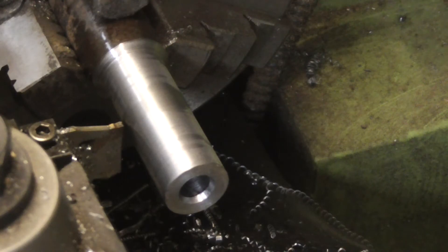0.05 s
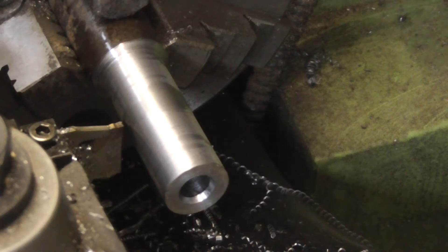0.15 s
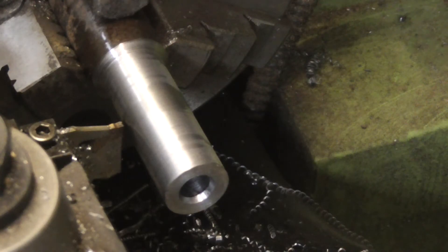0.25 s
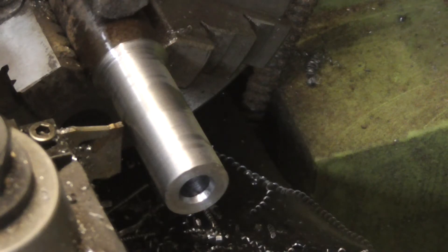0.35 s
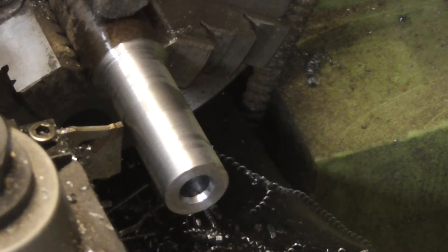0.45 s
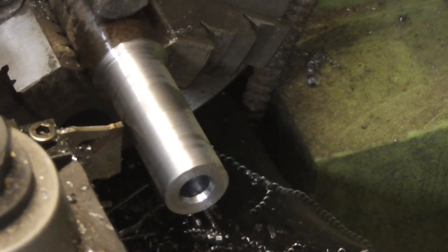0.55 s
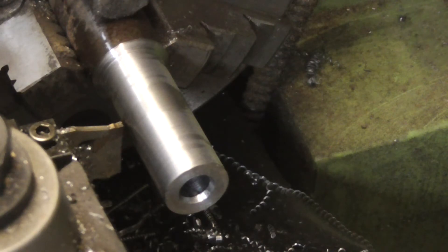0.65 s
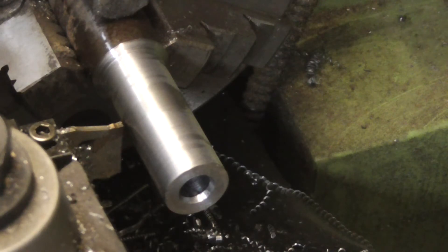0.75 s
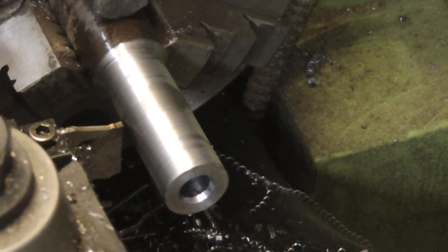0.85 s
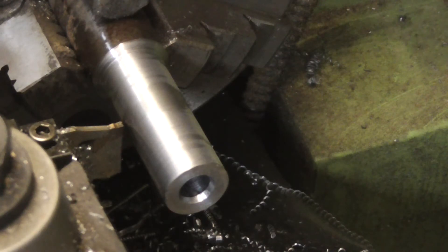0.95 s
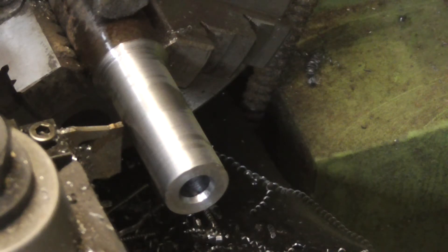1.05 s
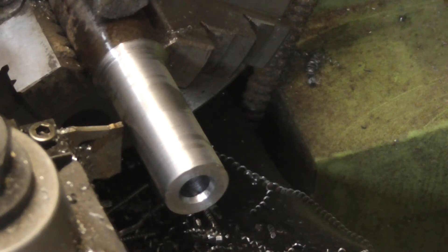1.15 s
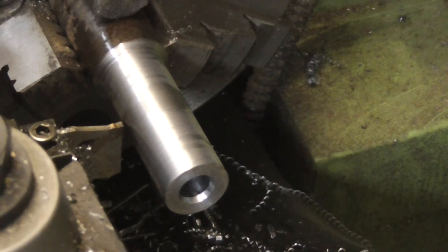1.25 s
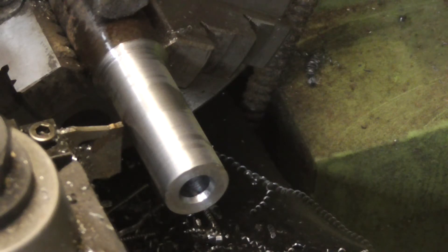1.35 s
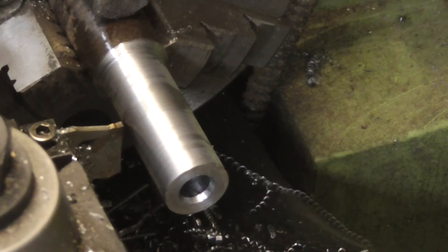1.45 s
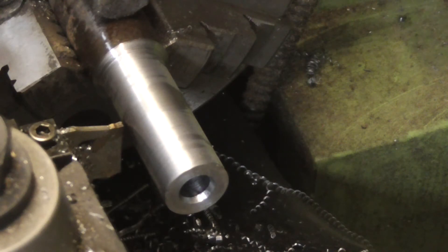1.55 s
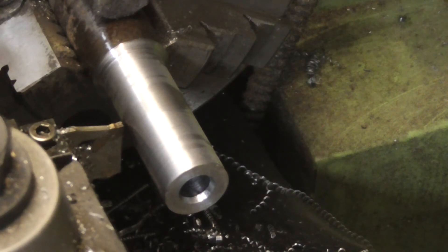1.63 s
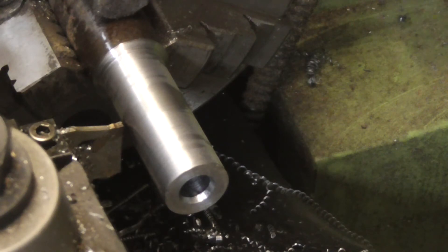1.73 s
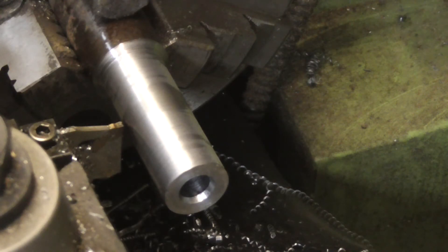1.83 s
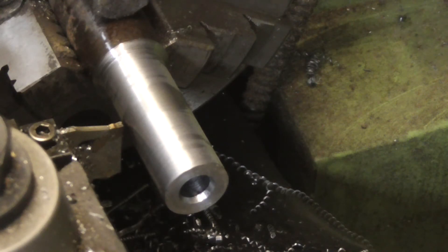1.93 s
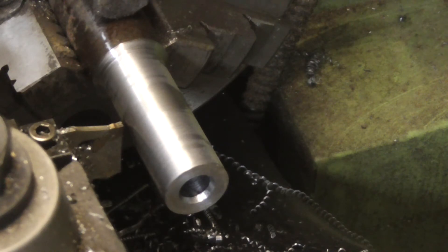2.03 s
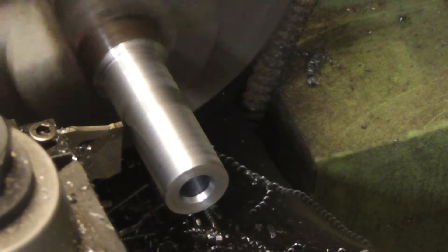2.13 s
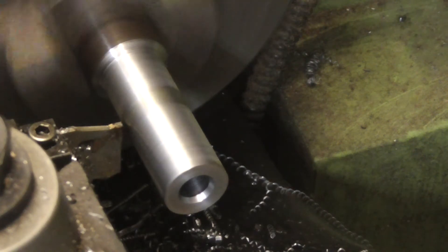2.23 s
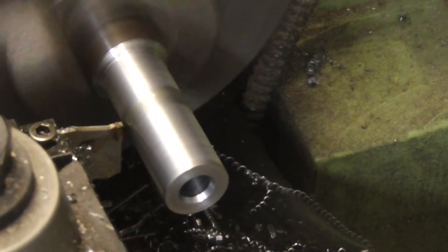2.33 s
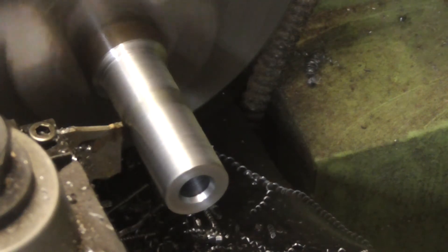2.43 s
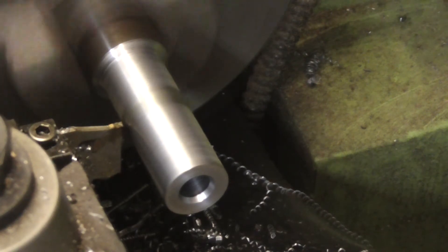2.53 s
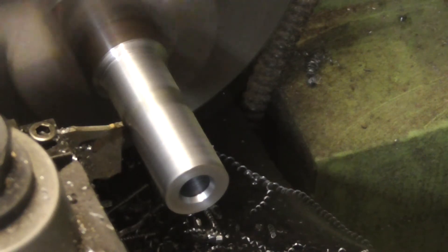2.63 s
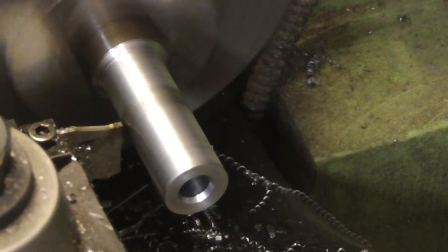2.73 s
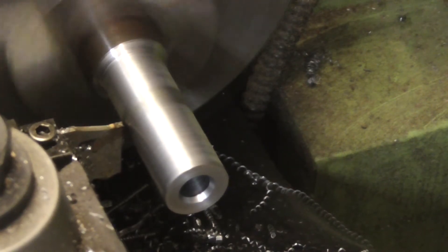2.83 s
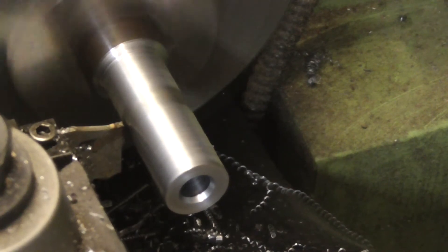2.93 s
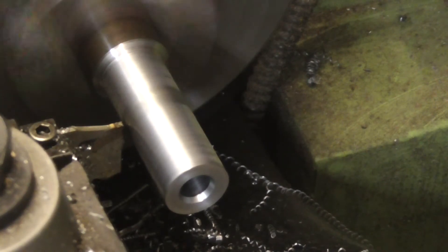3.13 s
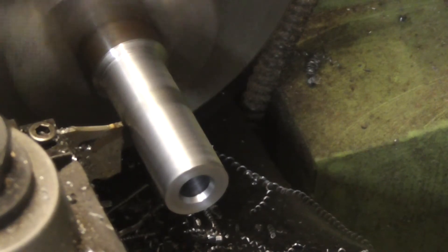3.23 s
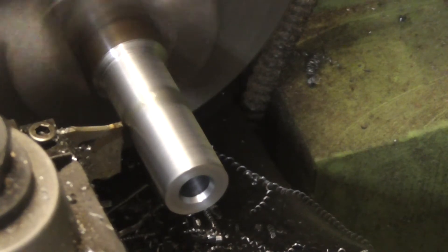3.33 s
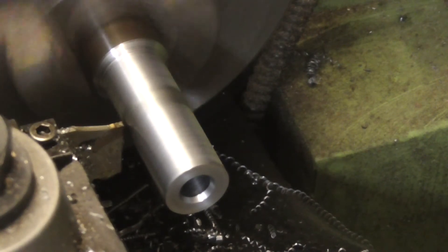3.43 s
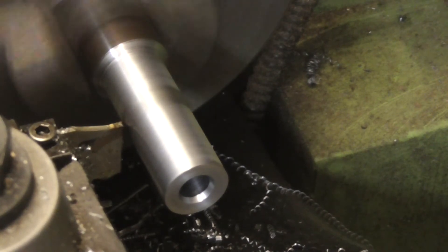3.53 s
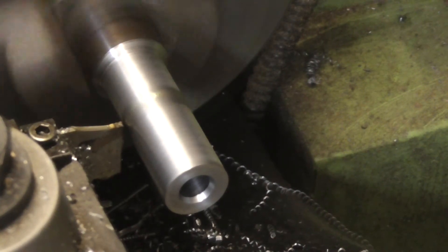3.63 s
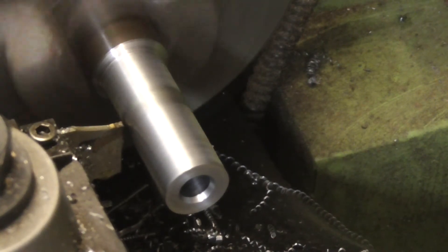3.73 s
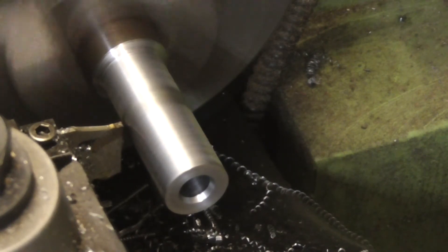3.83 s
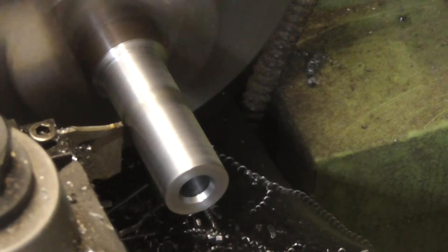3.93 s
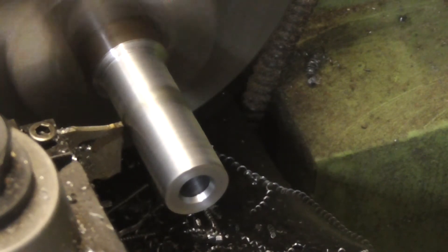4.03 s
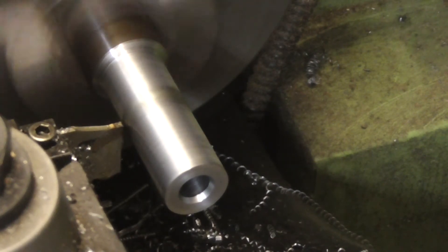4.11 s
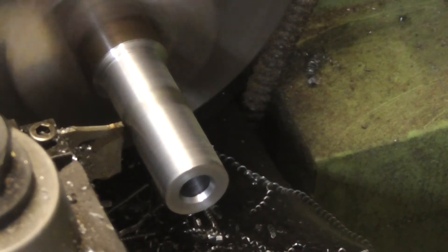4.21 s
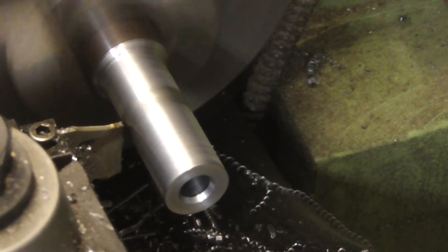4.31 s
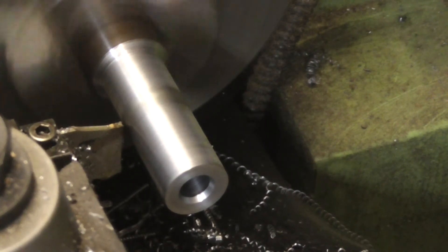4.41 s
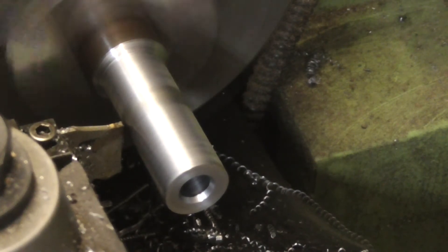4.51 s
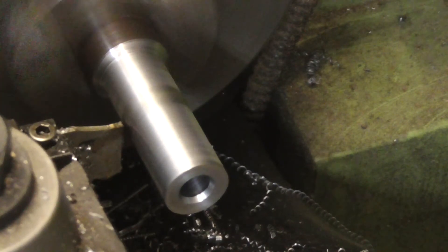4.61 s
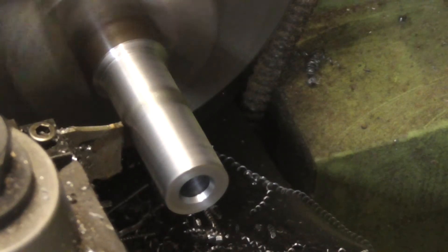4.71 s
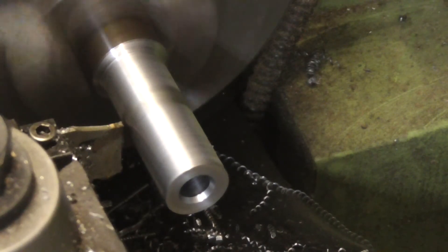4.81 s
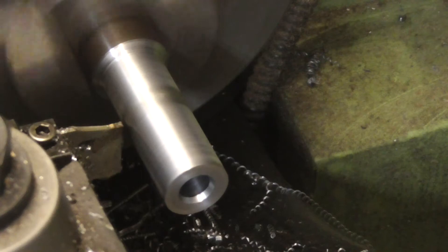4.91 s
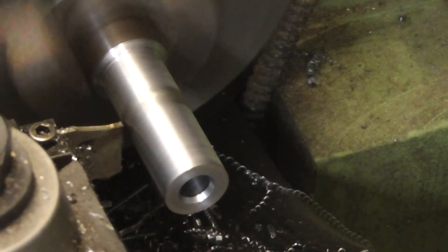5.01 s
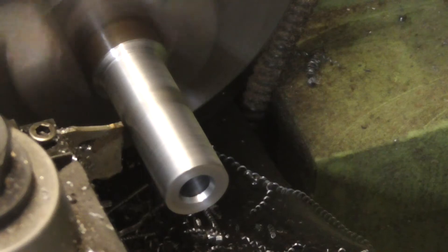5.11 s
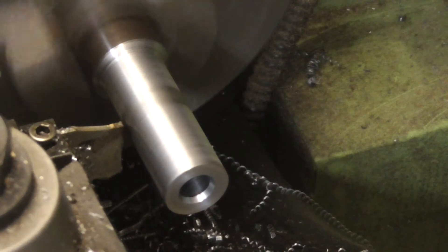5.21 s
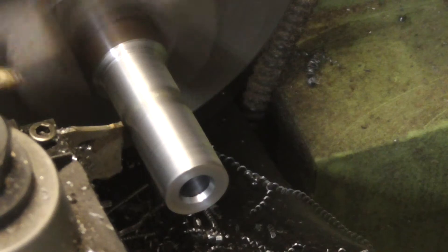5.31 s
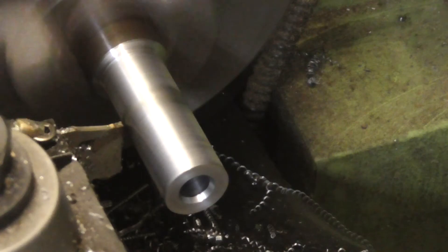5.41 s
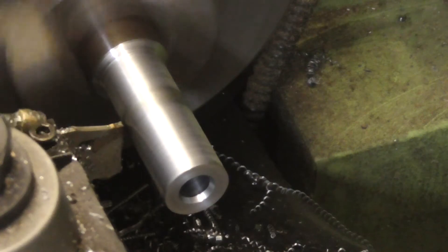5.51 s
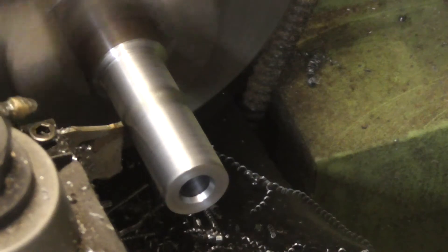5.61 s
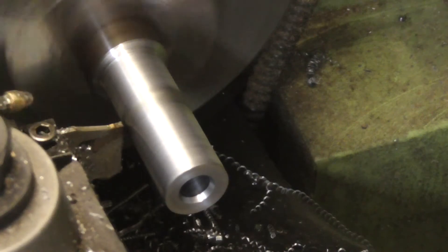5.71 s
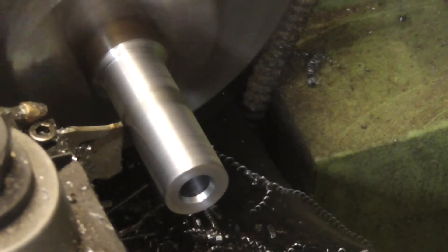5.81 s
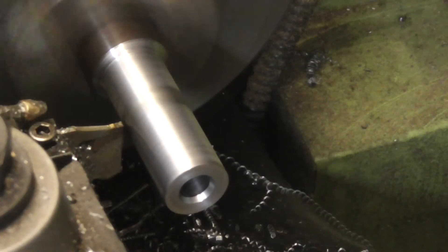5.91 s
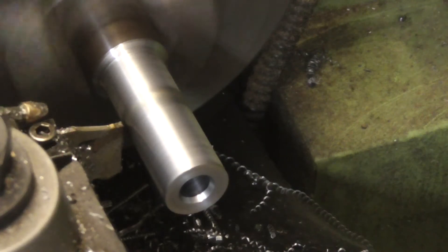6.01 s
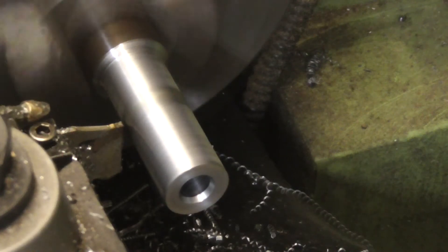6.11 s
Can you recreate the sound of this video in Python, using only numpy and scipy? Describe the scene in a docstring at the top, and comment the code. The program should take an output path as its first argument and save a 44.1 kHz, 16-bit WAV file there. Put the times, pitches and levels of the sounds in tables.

```python
"""A geared lathe runs up to speed before two microphone ports in a small workshop: gear teeth sing on shaft
orders, noise rumbles and booms through the casing, and narrow noise bands whine and sing on top.
Beforehand hands rustle as shaped noise, a lever clunks as body modes, loose parts ping as dying tones
and a switch snaps as bright noise bursts. Room tone and a faint idle hum lie behind, and a sparse echo
places the blows in the shop."""
import sys
import numpy as np
from scipy import signal
from scipy.fft import rfft, irfft
from scipy.io import wavfile
from scipy.ndimage import uniform_filter1d

SR = 44100
rng = np.random.default_rng(int(sys.argv[2]) if len(sys.argv) > 2 else 0)


def to_wav(s):
    """Save 16-bit WAV."""
    ch = np.atleast_2d(s).T  # columns
    pcm = np.round(np.clip(ch, -1, 1) * 32767)  # PCM
    wavfile.write(sys.argv[1], SR, pcm.astype(np.int16))


N = 271215  # samples
T, HZ = np.arange(N) / SR, np.fft.rfftfreq(N, 1 / SR)

SPINDLE_HZ, LAYSHAFT_HZ = 9.1233, 13.069  # turns a second at full speed
SWITCH_S, PULL_UP_S, PULL_UP_POWER = 2.1, 0.097, 1.55
LOAD_DB, PULL_DB, PULL_S, PULL_WIDE_S = 0.5, 3.5, 2.225, 0.075  # gear gain, extra while pulling up, when
THROB_HZ, THROB_DB, THROB_TOP_S = 3.32, 1, 4.09  # slow throb of the boom
EDGE_HZ = 16400  # recorder's upper edge

# tones of the spindle gears, before load and casing: [order of the shaft], [level/dB]
SPINDLE_ORDERS = [19, 27, 41, 43, 53, 55, 62, 75, 83, 86, 89, 95, 117, 118, 119, 129, 130, 131, 147, 159,
                  161, 163]
SPINDLE_DB = [-48, -51, -50, -47, -39, -49, -46, -48, -37.5, -31, -49, -52, -51, -49, -50, -50, -50, -51,
              -54, -47.5, -54, -55]
# tones of the layshaft gears, before load and casing: [order of the shaft], [level/dB]
LAYSHAFT_ORDERS = [27, 32, 34, 51, 72, 75, 112]
LAYSHAFT_DB = [-52, -39, -51, -45, -53, -52, -52]
# motor slot and bearing tones at full speed, before load and casing: [f/Hz], [level/dB]
MOTOR_HZ = [298.6, 316.6, 612.4, 723.7, 1129, 1155.1, 1720.6, 1934.1, 2094.3, 2243.2]
MOTOR_DB = [-55, -54, -45, -43, -50, -47, -60, -62, -60, -62]
# relative colour of the rumble: [f/Hz, level/dB per Hz]
RUMBLE_COLOUR = [(12, -60), (20, -18.5), (97, -18.5), (199, -8.5), (302, -11.5), (398, -8.5), (620, -11),
                 (770, -7), (800, -9.5), (889, -10.5), (1170, -10.5), (2690, -24.5), (4950, -25),
                 (5850, -36.5), (11400, -36.5), (15000, -101)]
# casing resonances lifted out of the rumble: [f/Hz], [width/Hz, relative level/dB]
CASING_HZ = [152, 246, 385, 415, 570, 660, 714, 774, 838, 955, 1085, 1170, 1350, 1485, 1570, 1700, 1870,
             2420, 2905, 3293, 3585, 3684, 3792, 4045, 4332, 4912, 4975, 5370, 6360, 9800, 690, 745, 895,
             1830, 2140]
CASING_SHAPE = [(26.8, 6.5), (10.1, -22.5), (30, 5), (19.1, 5.5), (50, 10), (21.7, 13), (18, 8.5),
                (15.3, 11), (12, 10.5), (31, 7.5), (40, -17), (125, 6), (30, 8.5), (60, 6), (60, 2.5),
                (59.7, -23), (95, -0.5), (120, 1.5), (40, 6), (35.3, 7.5), (40, 11), (50, 7.5), (39.7, 8.5),
                (39, 7), (155, 8.5), (39.8, 7.5), (101, 9.5), (74, 1.5), (80, 10.5), (231, -14), (12, 7),
                (30, 2), (30, 3), (30, 2.5), (200, 4)]
# start of the rumble, whose last level then holds: [t/s, level/dB]
RUMBLE_START = [(2.084, -39), (2.099, -40), (2.115, -19), (2.125, -23), (2.135, -29.5), (2.225, -29),
                (2.3, -30), (2.45, -29.5)]
# booming cabinet panels, before sharpening: [f/Hz], [width/Hz, relative level/dB]
PANEL_HZ = [199, 218]
PANEL_SHAPE = [(22.3, 9.5), (14.815, 4)]
# boom flaring in the pull-up, then wavering, before the throb: [t/s, level/dB]
BOOM_LEVEL = [(2.1, -43), (2.125, -28), (2.151, -28), (2.225, -21), (2.27, -36), (2.3, -35), (2.36, -31),
              (2.5, -38.5), (2.81, -29), (2.87, -52), (2.92, -31.5), (3.16, -33), (3.22, -27),
              (3.33, -32.5), (3.48, -29.5), (4.87, -34), (4.96, -24.5), (4.99, -34.5), (5.35, -30.5),
              (6.15, -31.5)]
# gearbox walls, width before sharpening: [f/Hz, width/Hz, mid level/dB]
HOUSING = [(530, 30, -45), (664, 24, -40), (714, 18, -42), (742, 24, -44), (773, 18, -37.5)]
# whining thin parts, width before sharpening: [f/Hz], [width/Hz, mid level/dB]
WHINE_HZ = [6752, 6725, 9005, 11255, 14000]
WHINE_SHAPE = [(16, -54), (25, -60.5), (50, -54), (45, -59), (70, -69)]
# two thin parts ringing with the drive, width before sharpening: [f/Hz], [width/Hz]
SING_HZ = [3296, 4915]
SING_WIDE_HZ = [40, 50]
# surges of the two thin parts, before flutter: [t/s, lower tone level/dB, upper tone level/dB]
SING_LEVEL = [(2.25, -63, -53), (2.48, -55, -48), (2.53, -45, -67), (2.63, -51, -47), (2.92, -45, -50),
              (2.97, -61.5, -43), (2.99, -53, -49), (3.93, -51, -50.5), (4.33, -63, -47),
              (4.36, -50.5, -53), (5.1, -59, -45.5), (5.13, -61, -63), (5.58, -52.5, -42.5),
              (5.91, -53, -55), (6.05, -62, -49.5), (6.15, -49, -56)]
# gear train chattering under the pull, before flutter: [t/s, level/dB]
GROWL_LEVEL = [(2.105, -57), (2.115, -27), (2.14, -29.5), (2.18, -27), (2.21, -27), (2.245, -21.5),
               (2.27, -28), (2.33, -59)]
# resonances of the chatter, before squaring: [f/Hz, width/Hz, relative level/dB]
GROWL_BODY = [(526, 330, -1), (737, 71, 1.5), (910, 100, 1), (1144, 100, 1.5), (1310, 150, -3.5)]
# blows on the machine body, before pan and echo: [t/s, peak level/dB, ring centre f/Hz]
KNOCKS = [(0.051, -43.5, 312), (0.126, -51, 295), (0.15, -49, 1000), (0.3, -56, 935), (0.4064, -29.5, 700),
          (0.4105, -19, 480), (0.423, -27, 463), (0.4294, -28, 520), (0.444, -25, 514), (0.461, -21, 470),
          (0.472, -33, 560), (0.489, -34, 510), (0.505, -31, 500), (0.528, -31, 477), (0.53, -48, 127),
          (0.54, -35, 560), (0.6, -52, 950), (0.691, -57, 980), (0.884, -47.5, 218), (0.929, -47, 212),
          (1.179, -61, 216), (1.602, -43, 229), (1.63, -56, 361), (1.66, -49, 218), (1.73, -50, 450),
          (1.766, -47, 1000), (1.848, -38, 1120), (1.885, -56, 302), (1.938, -53, 250), (2.055, -41, 650),
          (2.088, -39, 298), (2.111, -31, 732), (2.12, -17, 840), (2.169, -20.5, 770), (2.205, -19, 540),
          (2.2463, -16, 700), (2.313, -21, 740)]
# ringing modes of the machine body: [f/Hz, relative level/dB, t60/s]
BODY = [(130, -27, 0.6), (171, -4.5, 0.25), (213, -3, 0.11), (298, -4.5, 0.15), (391, 11.5, 0.022),
        (458, 0.5, 0.059), (496.6, 1.5, 0.097), (544, -2, 0.044), (758, -9.5, 0.19), (897, -17, 0.069),
        (972, -21, 0.4), (1040, -20.5, 0.39), (1106, 8, .022), (1163, -3.5, 0.086), (1261, -3, 0.092),
        (1525, -11, 0.097), (1632, -4, 0.085), (2050, -5, 0.04), (2300, -18, 0.033)]
# loose parts ringing on one note, before soft start, pan and echo: [t/s, level/dB, f/Hz, t60/s]
PINGS = [(0.125, -58, 1010, .3), (0.215, -58, 900, .5), (0.28, -61, 1400, .6), (0.3, -63, 1480, .6),
         (0.409, -22, 495, .05), (0.62, -60, 1000, .3), (0.408, -43, 1176, 0.081), (0.412, -40, 746, .07),
         (0.413, -32, 296, .3), (0.7, -58, 975, 0.22), (0.755, -58, 990, .12), (2.056, -35.5, 1136, 0.13),
         (2.243, -21, 1140, .09), (2.276, -16, 715, .06), (2.294, -20, 730, .03), (2.306, -17, 770, 0.099)]
# switch and small steel bits, before a common trim:
# [t/s, level/dB, t60/s, left-right difference/dB, centre f/Hz, loss below the centre/dB per octave]
TICKS = [(0.032, -55, 0.089, 0, 4000, 13), (0.407, -34, 0.05, 5, 3200, 13), (0.421, -39, .06, 1, 4900, 30),
         (0.438, -45, 0.11, 1, 4900, 45), (0.469, -40, .06, 1, 9000, 20), (0.505, -50, .08, 1, 5000, 20),
         (0.522, -50, .08, 1, 5400, 20), (0.541, -48, 0.11, 1, 5300, 20), (1.853, -53, .03, 1, 9500, 28),
         (1.9, -50, .03, -.5, 10000, 25), (2.0532, -19, 0.045, 1.5, 12000, 7.5),
         (2.062, -37, 0.33, 1, 7000, 4), (2.101, -28, 0.045, 0, 3900, 16), (2.112, -22, 0.029, 1, 4000, 2),
         (2.116, -33, 0.054, -1, 7000, 2), (4.2965, -27, 0.02, 5, 10400, 22),
         (4.3015, -25, .02, 3, 8900, 18), (4.308, -38, .03, -1, 9000, 30),
         (5.4505, -33, 0.023, -0.5, 9000, 25)]
# relative colour shared by the ticks: [f/Hz, level/dB per Hz]
TICK_COLOUR = [(290, -42), (500, -26), (896, -8), (1170, -34), (1390, 15), (2560, -5), (5560, 3), (6060, 3),
               (11900, -0.5), (15700, -7), (16400, -48)]
# ringing of the ticking steel: [f/Hz, width/Hz, relative level/dB]
STEEL = [(3850, 80, 8), (4500, 60, 1), (4670, 140, 2), (5090, 80, -5), (5500, 80, 3), (6500, 80, 1),
         (7670, 90, 1), (9950, 270, -3)]
# separate moves of the hands at the machine, levels before flutter: [start t/s, rise/s, hold/s, fade t60/s,
# thud level/dB, shuffle level/dB, steel scrape level/dB, cloth hiss level/dB]
MOVES = [(0.0, 0.036, 0.13, 0.75, -56.5, -56, -62.5, -64.5), (0.22, .11, 0.093, 0.36, -60, -56, -70, -79),
         (0.402, 0.0096, 0.014, 0.3, -57, -38, -44.5, -40.5),
         (0.453, 0.016, 0.0076, 0.27, -42, -43.5, -51, -41),
         (0.515, 0.017, 0.014, 0.2, -44, -48.5, -57, -48),
         (0.553, 0.017, 0.055, 0.64, -50.5, -60, -70, -86), (0.928, .01, 0.028, .08, -55, -62, -88, -82),
         (1.065, 0.037, .01, 0.17, -64, -63.5, -72, -83), (1.168, .01, .005, 0.15, -57, -64, -74, -88),
         (1.128, 0.42, 0.093, .3, -62, -63.5, -72, -72), (1.54, 0.069, 0.025, 0.45, -55, -61, -75, -64),
         (1.673, 0.088, 0.047, 0.59, -71, -56.5, -66.5, -64.5),
         (1.836, 0.016, 0.024, 1, -61, -65, -74, -74), (1.995, 0.027, .01, .1, -64, -72, -75, -70)]
# relative colours of the hands, one list each for thud, shuffle, scrape, hiss: [f/Hz, level/dB per Hz]
HAND_COLOURS = [
    [(35, -66), (60, -32), (118, -0.5), (233, 3.5), (296, -2), (376, 0), (500, -35), (650, -31),
     (1100, -120)],
    [(240, -46), (400, 4), (486, -2.5), (602, 3.5), (913, 1.5), (2100, -12.5), (2730, -54), (4620, -120)],
    [(1120, -44), (1900, -2), (2250, -4), (2560, -5.5), (4620, -2), (7000, -11), (9100, -38), (15400, -120)],
    [(3530, -42), (6000, -16), (7510, -3.5), (9010, -7.0), (9820, -2.0), (13300, -14),
     (15400, -25)] + [(15700, -70)],
]
# tools and trays ringing along with the hands: [f/Hz, width/Hz, relative level/dB]
LOOSE = [(126, 4.2, 19), (174, 6.1, 10), (199.5, 11, 13), (298, 13, 17.5), (338, 14, 12), (565, 15, 5),
         (906, 14, 8.5), (935, 7.1, 9), (1060, 14, 6), (1125, 20, 8.5), (1385, 25, 11), (1485, 20, 10),
         (4030, 48, 4), (5950, 54, 5), (4740, 62, 1), (5600, 120, 5), (9900, 530, -16)]
# relative colour of the room tone: [f/Hz, level/dB per Hz]
ROOM_COLOUR = [(18, -50), (30, -15), (48, -28), (90, -16), (177, -9.0), (315, 1.0), (442, -9.5),
               (1100, -13.0), (1670, -22.5), (4070, -27.5), (6020, -29.5), (11300, -25.5), (15400, -31),
               (15700, -70)]
ROOM_DB = -61.5
# idle electrical hum, level before slow wavering: [f/Hz, level/dB]
HUM = [(99, -69), (172, -82), (301, -79), (499, -82)]
# likeness of the two ports for the machine: [f/Hz, likeness 0 to 1]
MACHINE_SAME = [(60, 0.78), (130, 1), (290, 0.82), (640, 0.95), (1410, 0.61), (3100, 0.79), (6820, 0.5),
                (15000, 0.042)]
# likeness of the two ports for room and hands: [f/Hz, likeness 0 to 1]
ROOM_SAME = [(60, 0.88), (130, 0.94), (290, 0.81), (640, 0.72), (1410, 0.58), (3100, 0.53), (6820, 0.033),
             (15000, 0.097)]
# level of the left port over the right: [f/Hz, level/dB]
LEAN = [(60, 2), (110, 0), (200, -1.5), (380, -1.5), (700, -2), (790, -2.5), (1290, -4.5), (2380, -2.5),
        (4400, -1), (8120, 2), (15000, -3)]
# phase of the left port ahead of the right: [f/Hz, phase/rad]
LEAD = [(100, 0.064), (800, -0.59), (1300, -0.066), (5000, -0.17), (9000, -1.5)]


def lathe():
    """Teeth, casing and panels sound together, most layers growing with the spindle speed."""
    speed = spindle_speed()
    colour = gain_of(read(RUMBLE_COLOUR, HZ))
    lift = humps([(hz, *shape) for hz, shape in zip(CASING_HZ, CASING_SHAPE)])
    out = gears(colour * np.hypot(1, lift)) + rumble(colour, lift, speed) + boom()
    return out + housing() * speed ** 3 + whining() * speed ** 4 + singing()


def spindle_speed():
    """Share of full speed; the speed still missing dies as a stretched exponential after the switch."""
    since = np.maximum(T - SWITCH_S, 0)
    return 1 - np.exp(-(since / PULL_UP_S) ** PULL_UP_POWER)


def gears(casing):
    """Tooth and slot tones follow the speed; as they glide up, the casing colours their level."""
    spindle = SPINDLE_HZ * np.array(SPINDLE_ORDERS)
    layshaft = LAYSHAFT_HZ * np.array(LAYSHAFT_ORDERS)
    tone_hz = np.r_[spindle, layshaft, MOTOR_HZ]
    tone_db = np.r_[SPINDLE_DB, LAYSHAFT_DB, MOTOR_DB]
    speed = spindle_speed()
    shudder = 1 + 0.2478 * (1 - speed) * wobble(25.16)  # the drive judders until it is up to speed
    angle = 2 * np.pi * np.cumsum(speed * shudder) / SR
    at = np.arange(0, N / SR + 0.1, 0.07)  # chance points for swell and slip, s
    out = np.zeros((2, N))
    for hz, db in zip(tone_hz, tone_db):
        turn, side = rng.standard_normal(2)
        swell, slip = rng.standard_normal((2, len(at)))
        level = gain_of(db + 3.2 * np.interp(T, at, swell))
        phase = hz * angle + 2 * np.pi * (turn + 0.07 * np.interp(T, at, slip))
        lift = np.interp(hz * speed, HZ, casing) / np.interp(hz, HZ, casing)
        size = level * lift ** 0.47
        lean = gain_of(read(LEAN, hz) / 2 + 0.3 * side)
        out[0] += size * lean * np.sin(phase + read(LEAD, hz))
        out[1] += size / lean * np.sin(phase)
    pull = PULL_DB * np.exp(-((T - PULL_S) / PULL_WIDE_S) ** 2)  # teeth press harder while pulling up
    return np.sqrt(2) * out * speed * gain_of(LOAD_DB + pull + 0.6 * wobble(7.0))


def rumble(colour, lift, speed):
    """Noise, a pattern repeating at the full-speed turn and sparse grit pass through the casing."""
    pattern = np.resize(rng.standard_normal(round(SR / SPINDLE_HZ)), N)  # worn teeth meet again
    repeat = rfft(pattern) * humps([(1230, 150, -3.0)]) ** 2
    sizes = gain_of(2.6 * np.minimum(rng.exponential(1, N), 4))
    struck = rng.random(N) < 450 / SR  # about 450 strikes a second
    flecks = evened(sizes * struck * rng.choice([-1., 1.], N))
    # rough teeth and bearings strike unevenly
    grit = rfft(flecks) * humps([(2660, 3000, -6.5)]) * (HZ > 900)

    def through(gain):
        return ports((rfft(rng.standard_normal(N)) + repeat + grit) * gain, MACHINE_SAME)

    broad, ringing = through(colour), through(colour * lift)
    body = evened(broad + ringing * (0.4 + 0.6 * speed ** 3))  # the casing rings fully only at speed
    run = [*RUMBLE_START, (N / SR, RUMBLE_START[-1][1])]
    return body * curve(run, count=1) * gain_of(1.3 * wobble(39.0))


def boom():
    """Cabinet panels resonate in narrow low bands, partly evened out, with a slow throb."""
    panels = humps([(hz, *shape) for hz, shape in zip(PANEL_HZ, PANEL_SHAPE)])
    drone = steadied(noise(panels ** 1.8, MACHINE_SAME), 0.27)
    throb = gain_of(THROB_DB * np.cos(2 * np.pi * THROB_HZ * (T - THROB_TOP_S)))
    return drone * curve(BOOM_LEVEL, count=1) * throb


def steadied(x, share):
    """Takes part of the chance swelling out of a narrow band, so the boom's level curve leads."""
    swell = np.sqrt(uniform_filter1d((x ** 2).mean(0), size=1800) + 0.029)
    return evened(x / swell ** np.clip(share, 0, 1))


def housing():
    """The gearbox walls hum roughly around the tooth tones and beat against them."""
    return sum(gain_of(db + 1.5 * wobble(6.0)) * noise(humps([(hz, width, 0)]) ** 2, MACHINE_SAME)
               for hz, width, db in HOUSING)


def whining():
    """Thin parts whine in narrow bands of noise, each breaking up on its own."""
    breakup_db = 3.5  # rms
    return sum(gain_of(db + breakup_db * wobble(10.3)) * noise(humps([(hz, width, 0)]) ** 1.13, MACHINE_SAME)
               for hz, (width, db) in zip(WHINE_HZ, WHINE_SHAPE))


def singing():
    """Two thin parts whistle as narrow fluttering noise whose level comes and goes."""
    out = np.zeros((2, N))
    for column, (hz, width) in enumerate(zip(SING_HZ, SING_WIDE_HZ), start=1):
        level = curve(SING_LEVEL, count=column) * gain_of(2.9 * wobble(15.0))
        out += level * noise(humps([(hz, width, 0)]) ** 2, MACHINE_SAME)
    return out


def growl():
    """Rough resonant chatter while the motor drags the spindle up to speed."""
    level = curve(GROWL_LEVEL, count=1) * gain_of(3.0 * wobble(120))
    return level * noise(humps(GROWL_BODY) ** 2, MACHINE_SAME)


def knocks():
    """Every blow rings the same body modes, most those near its centre, each shaken by rough contact."""
    out, t = np.zeros(N + SR), T[:SR // 2]
    spread_db = 10  # loss per octave from the centre
    for s, db, centre_hz in KNOCKS:
        ring = np.zeros(len(t))
        for hz, mode_db, t60 in BODY:
            chance = rng.standard_normal(60)
            shake = 0.54 * np.interp(t / 0.0082, np.arange(60), chance - chance[0])  # rad, a point per 8.2 ms
            off_centre = abs(np.log2(hz / centre_hz))
            level = gain_of(mode_db - spread_db * off_centre - 60 * t / t60)
            ring += level * np.sin(2 * np.pi * hz * t + shake)
        ring *= 1 - np.exp(-t / 0.0025)  # the blow builds over a few ms
        start = round(s * SR)
        out[start:start + len(t)] += gain_of(db) * ring / abs(ring).max()
    return tail(out[:N] * gain_of([[0.8], [-0.8]]), t60=0.36, wet_db=-10.0)


def pings():
    """Loose parts ring as dying tones with a soft start and a slight waver."""
    out, t = np.zeros(N + SR), T[:SR // 2]
    for s, db, hz, t60 in PINGS:
        waver = 0.67 * np.interp(t / 0.012, np.arange(60), rng.standard_normal(60))  # rad
        level = gain_of(db - 60 * t / t60) * (1 - np.exp(-t / 0.0027))
        start = round(s * SR)
        out[start:start + len(t)] += level * np.sin(2 * np.pi * hz * t + waver)
    return tail(out[:N] * gain_of([[0.6], [-0.6]]), t60=0.3, wet_db=-8)


def ticks():
    """Switch and steel bits snap as short bright noise bursts coloured by steel resonances."""
    out, t = np.zeros((2, N + SR)), T[:4096]
    hz = np.fft.rfftfreq(len(t), 1 / SR)
    power = sum(gain_of(2 * db) / (1 + (2 * (hz - mode_hz) / width) ** 2) for mode_hz, width, db in STEEL)
    rings = np.sqrt(1 + power)
    for s, db, t60, pan_db, centre_hz, loss_db in TICKS:
        steepness = np.where(hz > centre_hz, 1.6, 1)  # highs fall off faster
        loss = loss_db * steepness * abs(np.log2((hz + 1) / centre_hz))
        colour = gain_of(read(TICK_COLOUR, hz) - loss)
        a, b = rng.standard_normal((2, len(t)))
        pair = np.array([a, 0.63 * a + b])  # partly alike at the two ports
        burst = evened(irfft(rfft(pair) * colour * rings)) * np.minimum(t / 0.0008, 1) ** 2
        pan = np.array([[pan_db / 2], [-pan_db / 2]])
        start = round(s * SR)
        out[:, start:start + len(t)] += burst * gain_of(db - 2.5 - 60 * t / t60 + pan)
    return tail(out[:, :N], t60=0.18, wet_db=-7.5)


def hands():
    """Moving hands rustle as four colours of noise, with tools and trays ringing along."""
    out = np.zeros((2, N))
    for level, colour in zip(hand_levels(), HAND_COLOURS):
        rustle = noise(gain_of(read(colour, HZ)) * np.hypot(1, humps(LOOSE)), ROOM_SAME)
        out += level * rustle * gain_of(1.2 * wobble(80))
    return out


def hand_levels():
    """Each move rises, holds and fades; gains of the four colours over time."""
    power, t = np.zeros((len(HAND_COLOURS), N)), T[:SR]
    for start_s, rise, hold, t60, *dbs in MOVES:
        fade = gain_of(-60 * np.maximum(t - rise - hold, 0) / t60)
        shape = np.minimum(t / rise, 1) ** 2 * fade
        start = round(start_s * SR)
        power[:, start:start + SR] += (gain_of(dbs)[:, None] * shape) ** 2
    return np.sqrt(power)


def quiet_room():
    """Steady coloured room noise with faint, slowly wavering tones of an idle electrical hum."""
    out = gain_of(ROOM_DB) * noise(gain_of(read(ROOM_COLOUR, HZ)), ROOM_SAME)
    for hz, db in HUM:
        out += gain_of(db + 2.6 * wobble(4.9)) * np.sqrt(2) * np.sin(2 * np.pi * hz * T)
    return out


def tail(x, t60, wet_db):
    """Adds the workshop's echo: sparse taps dying away, other ones on each side."""
    t = T[:SR // 2]
    chosen = rng.random((2, len(t))) < 0.06
    fade = gain_of(-60 * t / t60) * (t > 0.004)
    taps = rng.standard_normal((2, len(t))) * chosen * fade
    echo = signal.fftconvolve(x, taps / np.linalg.norm(taps[0]), axes=1)[:, :N]
    return x + gain_of(wet_db) * echo


def ports(a, same):
    """Spreads a spectrum over the two microphone ports; the unlike part is the room's scatter."""
    alike = np.clip(read(same, HZ), 0, 1)
    scatter = abs(a) * np.exp(2j * np.pi * rng.random(len(HZ)))
    left = a * gain_of(read(LEAN, HZ)) * np.exp(1j * read(LEAD, HZ))
    right = alike * a + np.sqrt(1 - alike ** 2) * scatter
    return irfft(np.array([left, right]), N)


def noise(gain, same):
    """Two-port noise of a given colour, rms 1."""
    return evened(ports(rfft(rng.standard_normal(N)) * gain, same))


def wobble(per_s):
    """Slow chance, rms 1, weakening above per_s Hz."""
    return evened(irfft(rfft(rng.standard_normal(N)) / (1 + (HZ / per_s) ** 2), N))


def humps(modes):
    """Summed amplitude response of resonances, added as power."""
    return np.sqrt(sum(gain_of(2 * db) / (1 + (2 * (HZ - hz) / width) ** 2) for hz, width, db in modes))


def curve(rows, count):
    """Column number count as a gain over time, silent before the first row and after the last."""
    rows = np.asarray(rows)
    return gain_of(np.interp(T, rows[:, 0], rows[:, count], left=-150, right=-150))


def read(points, hz):
    """Reads a table between its points on a logarithmic frequency scale."""
    f, value = np.transpose(points)
    return np.interp(np.log(hz + 1), np.log(f + 1), value)


def gain_of(db):
    """Amplitude factor of a level in dB."""
    return 10 ** (np.asarray(db) / 20)


def evened(x):
    """Scales a signal to rms 1."""
    return x / np.sqrt(np.mean(x ** 2) + 1e-20)


def scene():
    """The lathe and its chatter, the blows and snaps, the hands, then the room behind."""
    return lathe() + growl() + knocks() + pings() + ticks() + hands() + quiet_room()


def record(dry):
    """The band limit of the recorder: a linear-phase low-pass."""
    low_pass = signal.firwin(511, EDGE_HZ, window=("kaiser", 9), fs=SR)
    return signal.oaconvolve(dry, low_pass[None], "same")


dry = scene()
out = record(dry)
to_wav(out)
```